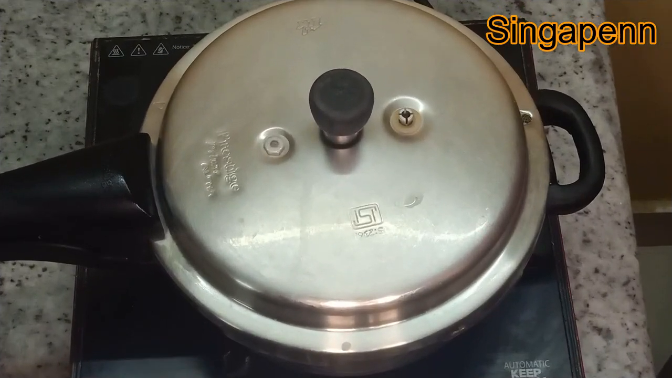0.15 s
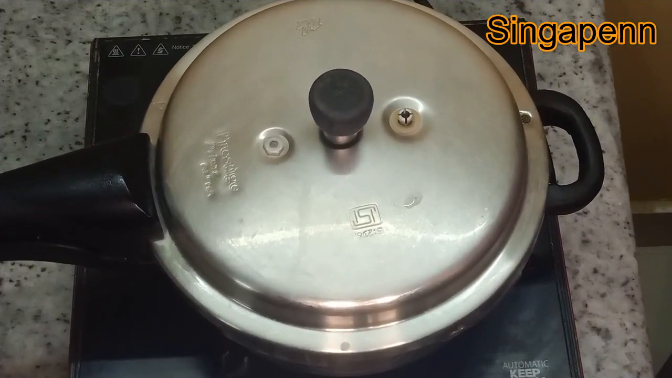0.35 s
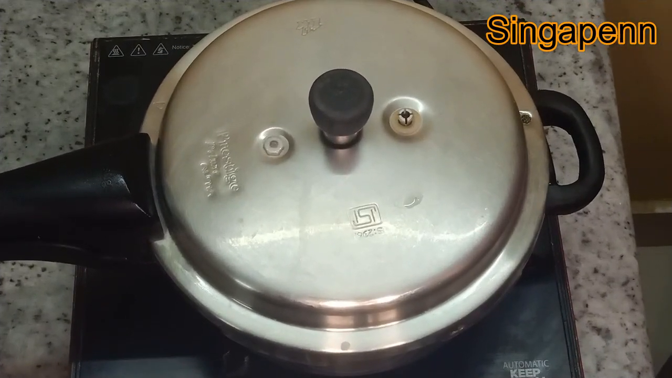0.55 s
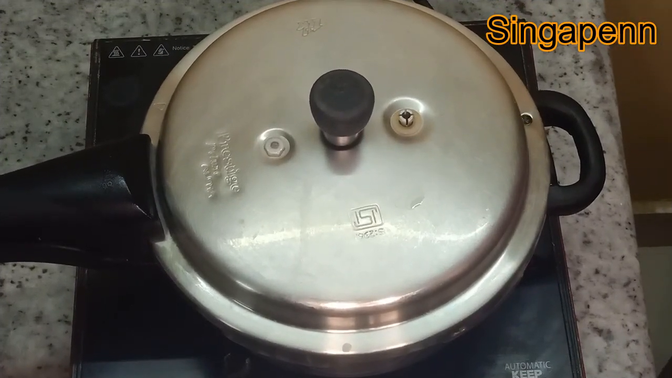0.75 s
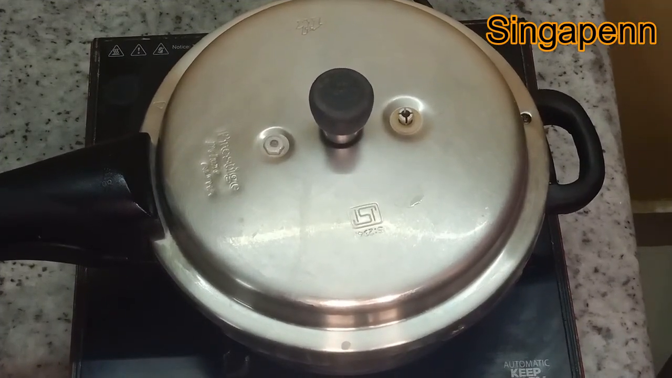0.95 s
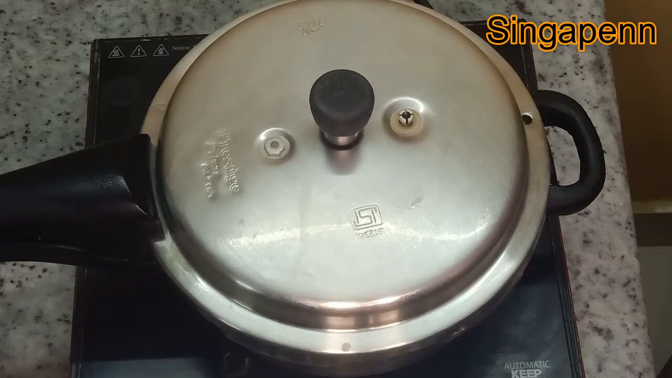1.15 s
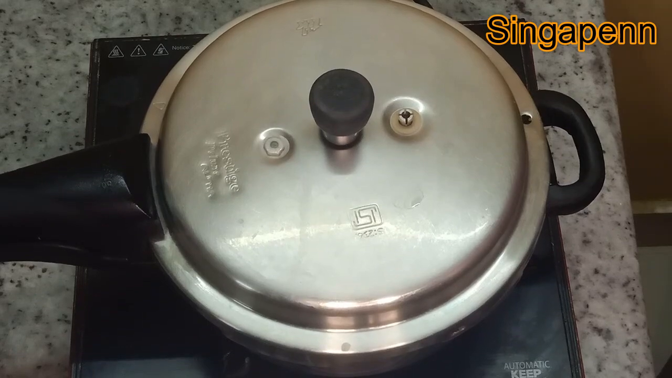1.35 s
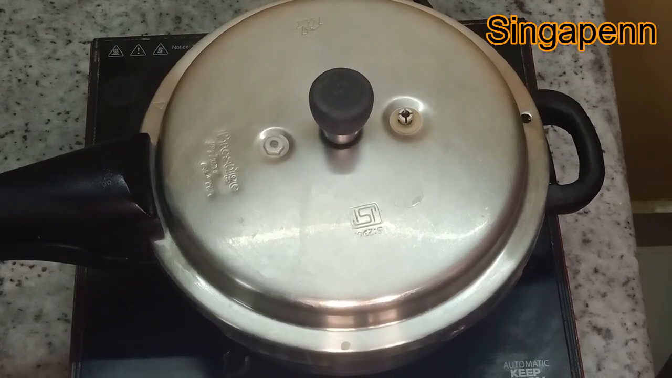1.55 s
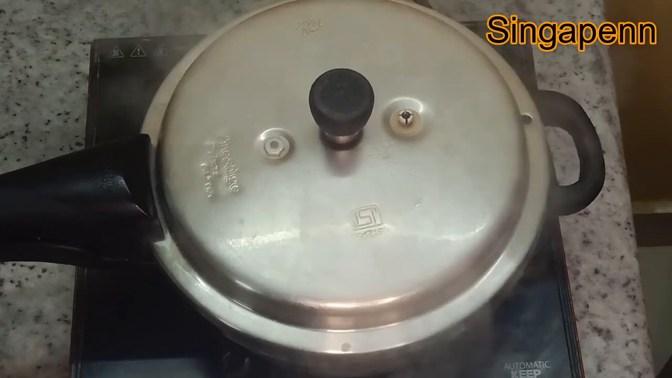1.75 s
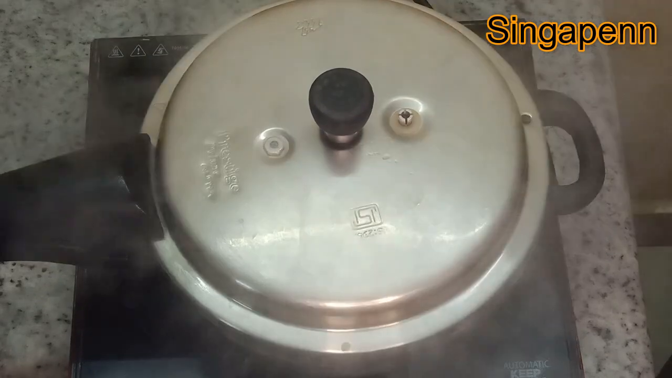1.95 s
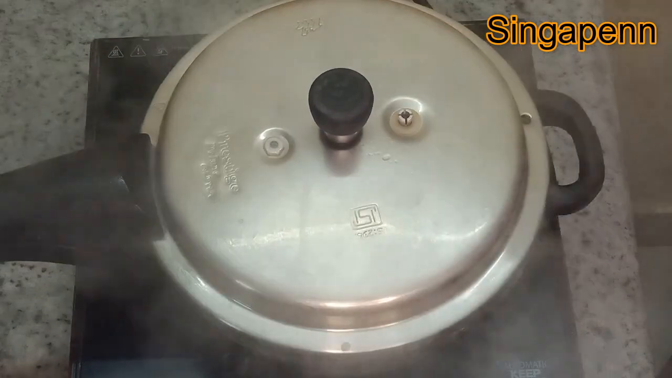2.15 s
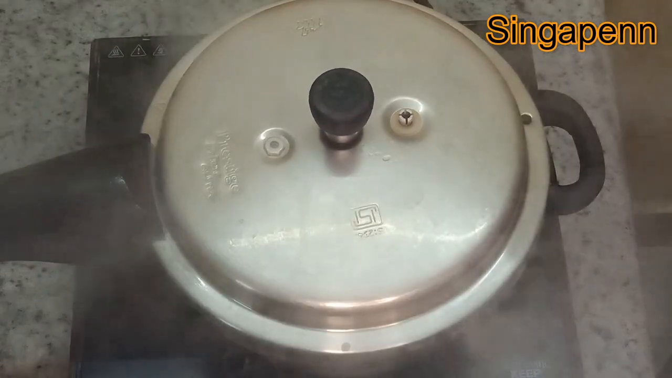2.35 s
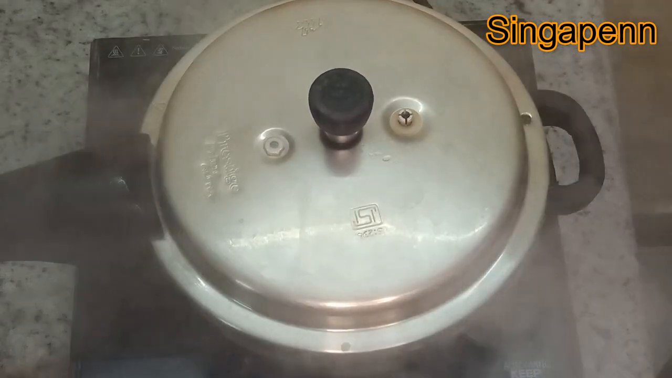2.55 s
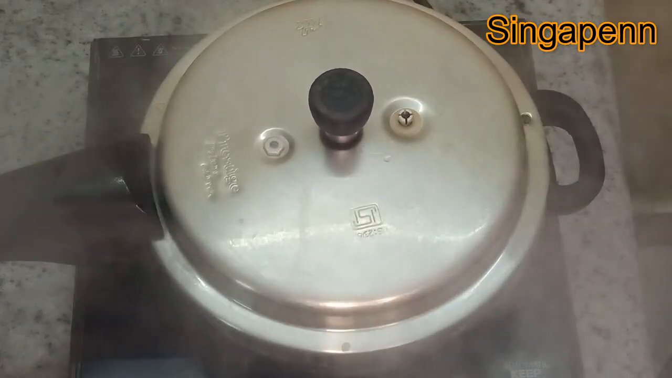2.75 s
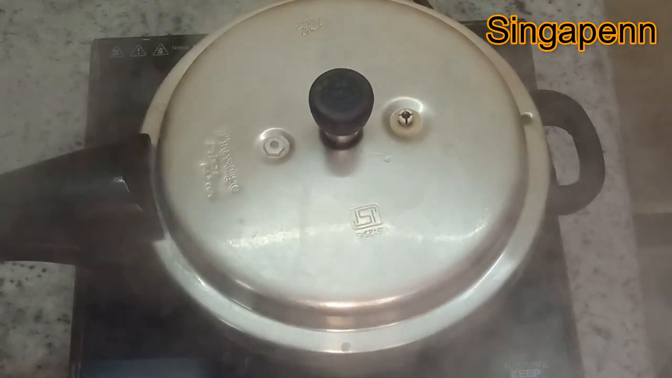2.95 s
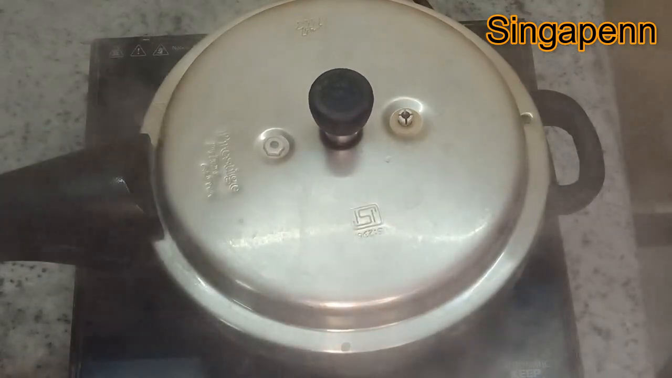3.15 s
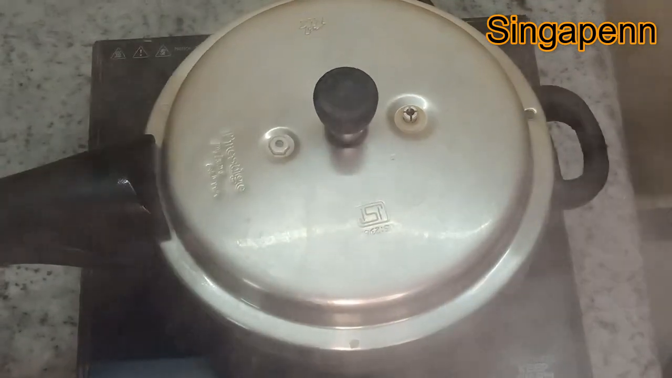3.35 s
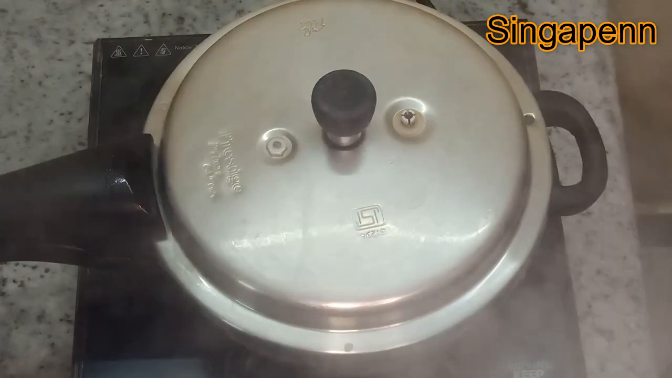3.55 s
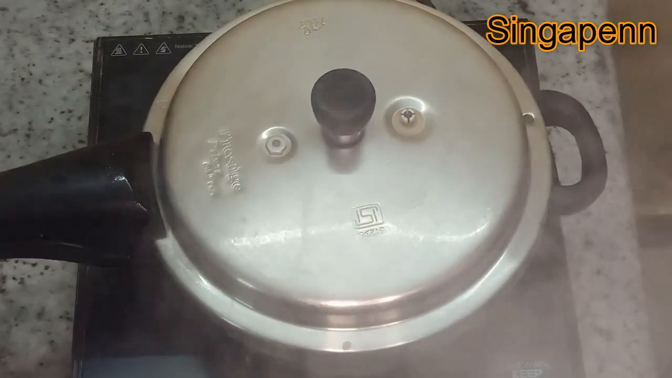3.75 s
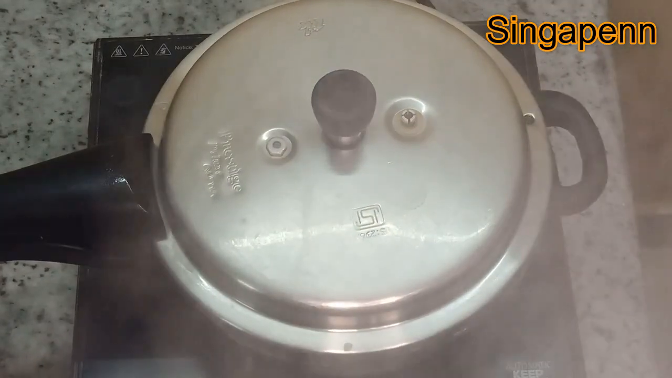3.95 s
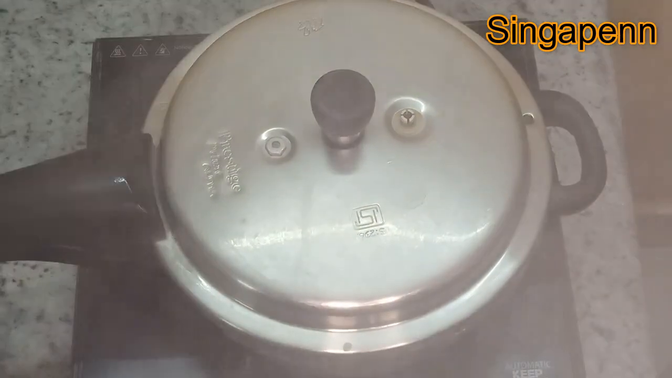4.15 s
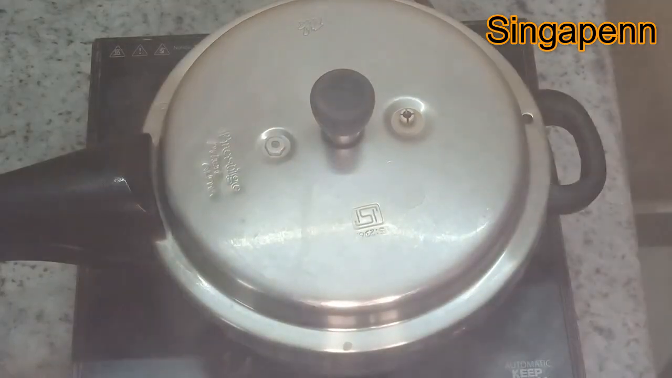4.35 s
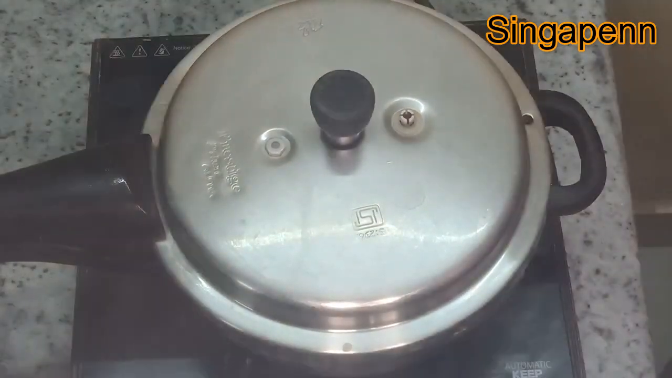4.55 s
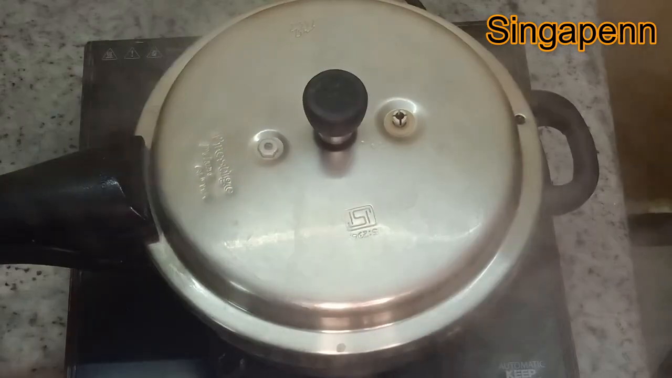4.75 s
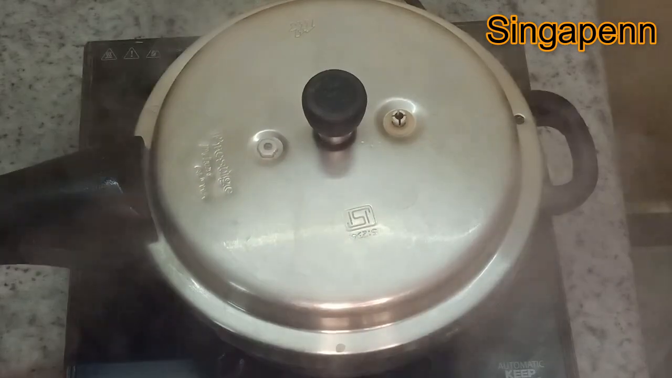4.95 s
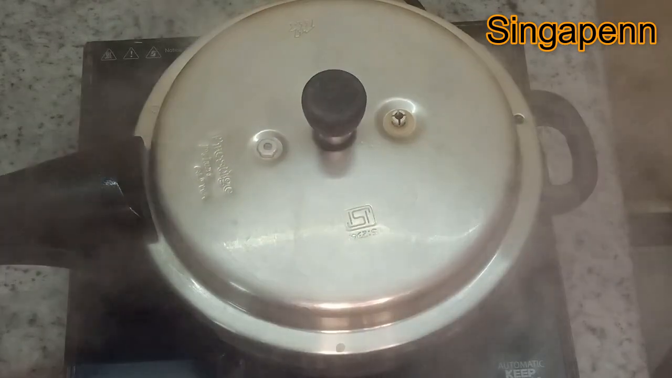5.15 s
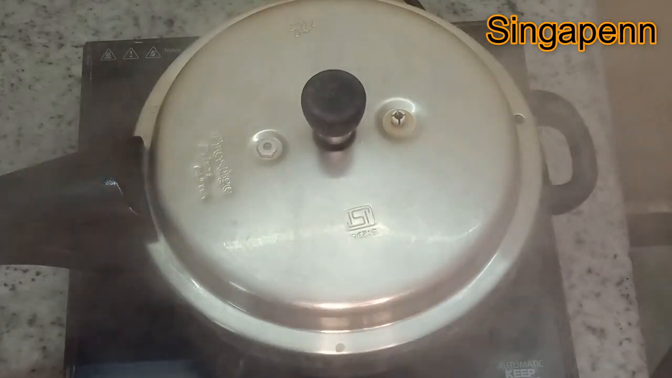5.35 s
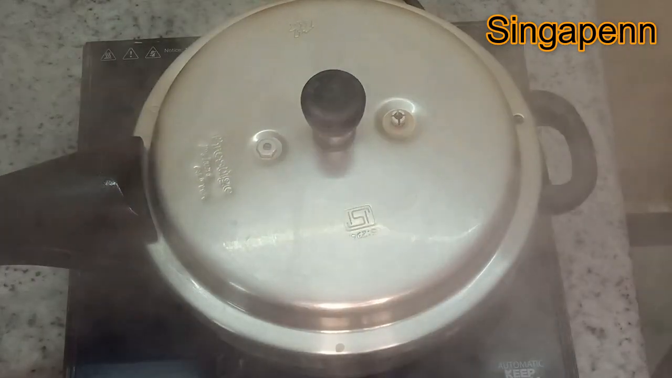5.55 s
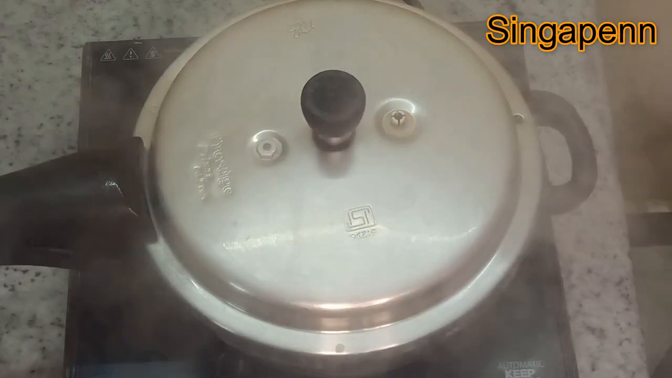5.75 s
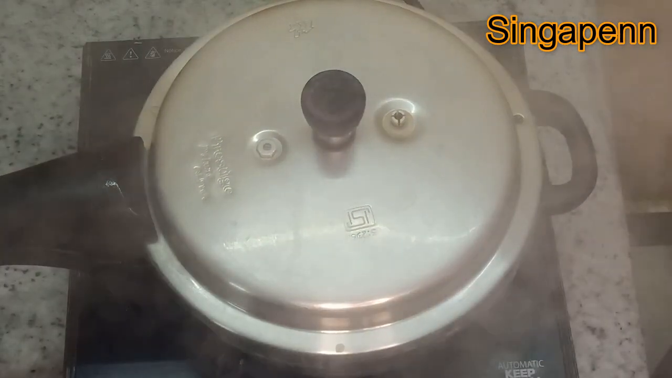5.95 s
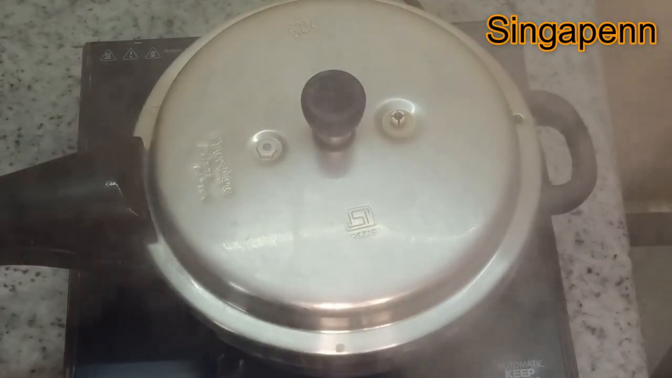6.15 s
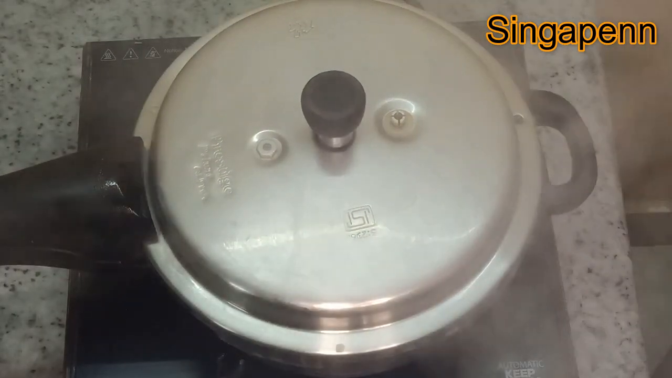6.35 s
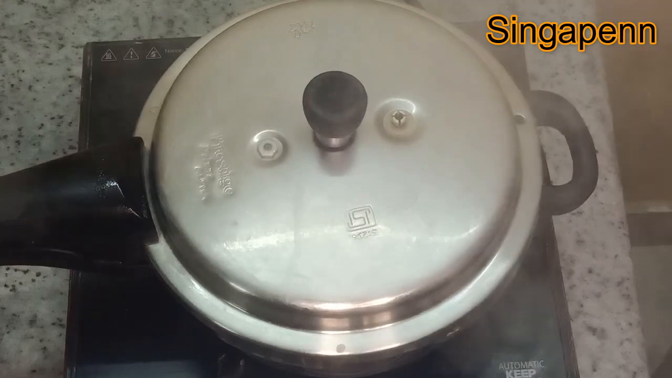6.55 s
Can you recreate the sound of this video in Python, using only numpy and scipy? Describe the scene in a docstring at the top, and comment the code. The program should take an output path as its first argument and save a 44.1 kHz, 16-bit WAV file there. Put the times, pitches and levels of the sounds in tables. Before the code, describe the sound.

A pressure cooker vents twice in a kitchen, heard in stereo over the soft whir of a hob fan. After a brief low drone and some sputtering leaks, steam bursts out in a bright hiss with a little low rumble on the microphone. It pauses, then bursts out again. Each blast starts loud, settles lower and finishes with the valve weight clattering on the metal lid. Two tiny dropouts interrupt the sound.

```python
"""A pressure cooker: steam leaks past the weight valve, then lifts it twice. Each blast starts loud,
sinks as if turned down automatically, holds, and ends as the weight rattles onto its seat, ringing
the lid. The induction hob's fan whirs behind it; a dull drone sounds at the start. A two-port
microphone hears it, from a second position for the second blast. The sound cuts out briefly twice."""
import sys
import numpy as np
from scipy import signal
from scipy.io import wavfile
from scipy.ndimage import uniform_filter1d

SR = 44100
rng = np.random.default_rng(int(sys.argv[2]) if len(sys.argv) > 2 else 0)


def wav_out(sig):
    """Save sig, one row per channel (or a flat mono array), as 16-bit PCM at SR to the path in sys.argv[1]."""
    wavfile.write(sys.argv[1], SR, np.round(np.clip(np.atleast_2d(sig).T, -1, 1) * 32767).astype(np.int16))


N = 291623
T = np.arange(N) / SR
FFT_SIZE, HOP = 2048, 512
BIN_HZ = np.fft.rfftfreq(FFT_SIZE, 1 / SR)
FRAME_S = np.arange(N // HOP + 5) * HOP / SR


def gain(db):
    """dB to amplitude factor."""
    return 10 ** (np.asarray(db) / 20)


def unit_rms(x):
    """Scale to rms 1 over all channels."""
    return x / np.sqrt(np.mean(x ** 2) + 1e-20)


def spectrum(table, column=1):
    """Table column interpolated over the bins, log frequency."""
    table = np.array(table)
    return np.interp(np.log(BIN_HZ + 1), np.log(table[:, 0] + 1), table[:, column])[:, None]


def bells(hz, width_hz):
    """One unit-height bell over the bins per centre."""
    return np.exp(-2 * ((BIN_HZ - hz[:, None]) / width_hz[:, None]) ** 2)


def pan_db(left_minus_right_db):
    """Split a balance into left and right offsets."""
    return left_minus_right_db * np.array([.5, -.5])[:, None, None]


def air_noise(colour_db, coherence, patch_db, flicker_db, lead_rad=0):
    """Unit-rms stereo noise with drifting spectral patches and a shared level flicker."""
    a, b, c, d, patches = rng.standard_normal((len(FRAME_S), len(BIN_HZ), 5)).T
    patches = unit_rms(uniform_filter1d(uniform_filter1d(patches, size=25, axis=0), size=5, axis=1))
    flicker = unit_rms(uniform_filter1d(uniform_filter1d(rng.standard_normal(N), size=300), size=300))
    left = a + 1j * b
    right = coherence * np.exp(1j * lead_rad) * left + np.sqrt(1 - coherence ** 2) * (c + 1j * d)
    spectra = np.array([left, right]) * gain(colour_db + patch_db * patches)
    noise = signal.istft(spectra, nperseg=FFT_SIZE, noverlap=FFT_SIZE - HOP)[1][:, :N]
    return unit_rms(noise * gain(flicker_db * flicker))


# Drone spectrum: f/Hz, relative density/dB
DRONE_SPECTRUM = [(24, -103), (40, -73), (74, -70), (135, -13.5), (246, -4), (367, -12.5), (834, -14),
                  (1160, -18), (1660, -15), (3520, -26.5), (8000, -47), (10400, -97), (17600, -120)]


def drone():
    """Dull centred noise with one brief swell; stops at the first silence."""
    swell_s, width_s = .416, .04
    level_db = -55 + 4.5 * np.exp(-((T - swell_s) / width_s) ** 2)
    noise = air_noise(spectrum(DRONE_SPECTRUM), coherence=1, patch_db=1.5, flicker_db=1)
    return noise * gain(level_db) * (T < SILENCES[0][0])


# Air through the housing: f/Hz, relative density/dB
FAN_SPECTRUM = [(25, -22), (60, -13), (100, -8), (200, -14), (300, 0.5), (420, -7), (750, -7.5), (1100, 1),
                (1400, -3), (2100, -3), (4500, -19), (6500, -14), (7800, -18.5), (8800, -38.5),
                (15500, -38)]
# Likeness of the channels: f/Hz, correlation
FAN_COHERENCE = [(60, 0.84), (130, 0.86), (290, 0.89), (640, 0.43), (1410, 0.18), (3100, -0.04),
                 (6820, -0.05), (15000, -0.17)]
# Balance: f/Hz, left minus right/dB
FAN_PAN = [(60, 0.0), (130, -0.5), (290, -0.5), (640, 0.0), (1410, 1.5), (3100, -0.5), (6820, -0.5),
           (15000, -3.0)]
# Blade and housing tones: f/Hz, width/Hz, level re air/dB
BLADE_TONES = [(281, 10, -15), (371, 25, -18), (910, 20, -22), (1058, 20, -11), (1125, 12, -9),
               (1206, 25, -14), (1265, 25, -18), (1969, 10, -20)]
# Extra gain of the tones below 500 Hz: t/s, gain/dB
HUM_GAIN = [(.15, -13), (.3, -2), (.58, -4.5), (1.0, 7), (1.6, -0.5), (3.5, -5), (6.62, -2)]


def fan():
    """Housing air and wavering blade tones; quieter from the first blast on, dipping under each."""
    start_s, early_db, late_db, dip_db = .15, -50.5, -57, 3.5
    balance_db = pan_db(spectrum(FAN_PAN))
    whir = air_noise(spectrum(FAN_SPECTRUM) + balance_db, spectrum(FAN_COHERENCE),
                     patch_db=1, flicker_db=.5)
    hum = gain(np.interp(T, *np.transpose(HUM_GAIN)))
    for hz, width_hz, db in BLADE_TONES:
        pole = np.exp(-np.pi * width_hz / SR)
        waver = signal.lfilter([1], [1, -pole], rng.standard_normal(N) + 1j * rng.standard_normal(N))
        tone = unit_rms((waver * np.exp(2j * np.pi * hz * T)).real)
        tone_db = db + balance_db[:, round(hz / BIN_HZ[1])]
        whir += tone * gain(tone_db) * (hum if hz < 500 else 1)
    lift_s, _, _, _, sag_s, _ = VALVE_LIFTS[0]
    level_db = np.interp(T, [lift_s, lift_s + sag_s], [early_db, late_db])
    dip = sum(sunk * (T < drop_s + SHUT_S / 2) for _, _, sunk, drop_s in blast_envelopes())
    return whir * gain(level_db - dip_db * uniform_filter1d(dip, size=8000)) * (T > start_s)


# Lid, hob and wall echoes: f/Hz, width/Hz, gain/dB at left 1, right 1, left 2, right 2 (positions 1, 2)
ECHO_BANDS = [(1100, 600, 3.2, 2.4, 2.9, 4.4), (1540, 200, -2.7, 2.6, -2.6, 2.5),
              (2060, 350, -0.4, -2.2, -1.6, -4.8), (2340, 70, 3.3, 0.3, 3.0, 0.1),
              (2540, 200, -0.9, -0.7, -2.4, -3.5), (2740, 70, 1.1, 2.5, 0.9, 2.7),
              (2900, 200, 4.1, 2.8, 2.8, 0.9), (3060, 70, -0.2, -1.9, 1.0, -2.7),
              (3220, 120, -2.6, 2.6, -0.1, -0.6), (3380, 350, -1.4, 3.0, -2.7, 6.3),
              (3780, 350, 2.0, -0.6, 2.3, 3.5), (4020, 120, 1.7, -4.1, -0.4, -5.0),
              (4260, 200, -4.0, -4.1, -5.5, -5.6), (4620, 200, 2.3, 1.8, 1.0, 0.1),
              (4860, 120, 0.3, 0.7, 1.2, -3.4), (4980, 200, -0.4, -6.0, 0.2, -4.3),
              (5300, 200, -3.3, -3.4, -3.9, -1.1), (5540, 120, 0.9, 2.2, 0.7, 2.0),
              (6060, 350, 3.1, 2.6, 1.2, 3.4), (6540, 200, -0.9, -1.6, -1.8, -4.5),
              (6900, 200, -0.6, 1.9, -0.2, 0.9), (7180, 200, 4.0, 2.6, 5.0, 1.0),
              (7540, 200, -4.5, -2.7, -4.2, -0.0), (7820, 200, 0.6, 5.5, 1.0, 9.1),
              (8700, 1000, -2.9, 0.3, -1.8, 0.6), (10380, 350, -2.4, -2.1, 0.0, 1.1),
              (11660, 600, 1.2, 1.7, 1.1, 3.1), (13100, 600, -1.6, -2.6, 0.5, 1.2),
              (13860, 1000, -2.6, 1.7, -1.8, 0.7), (15420, 1000, -0.6, 4.5, -8.2, 6.3)]
# Narrow steady peaks that colour the steam hiss: f/Hz, width/Hz, gain/dB
HISS_PEAKS = [(2358, 30, 3), (2758, 60, 3), (3371, 50, 2), (4047, 20, 5), (4175, 25, 3), (4600, 80, 2),
              (4938, 20, 3), (5798, 50, 3), (6069, 25, 3), (6282, 30, 4)]
# Steam at the two ports: f/Hz, coherence, right lead/rad at position 1, at position 2
PORT_COHERENCE = [(300, .3, 0, 0), (1000, .45, -.3, -.6), (1750, .7, -1.1, -2.1), (2150, .3, -.6, -1.5),
                  (2750, .8, -.5, -.4), (3150, .25, -1.7, -1.8), (3650, .78, -2.3, -2.2),
                  (4150, .35, -2.6, -2.6), (4600, .72, -1.9, -2.1), (5200, .35, -1.6, -1.6),
                  (5500, .5, -2.4, -2.2), (5800, .4, -5.3, -5.3), (6300, .6, -3.7, -3.8),
                  (7100, .55, -2.8, -3.6), (7700, .4, -5.2, -5.5), (8600, .35, -4.8, -5.6),
                  (9400, .25, -3.6, -4), (10600, .55, -3.4, -3.4), (13200, .6, -3.1, -3.1),
                  (14000, .2, -3.1, -3.1)]


def steam_path():
    """Peaks, notches and port phase that the steam picks up on its way through the room."""
    at_first_position = FRAME_S < 4.365
    hz, width_hz, *band_db = np.transpose(ECHO_BANDS)
    position_db = (np.array(band_db) @ bells(hz, width_hz)).reshape(2, 2, -1, 1)
    echo_db = np.where(at_first_position, *position_db)
    lead_rad = np.where(at_first_position, spectrum(PORT_COHERENCE, 2), spectrum(PORT_COHERENCE, 3))
    hz, width_hz, height_db = np.transpose(HISS_PEAKS)
    peaks_db = (height_db @ bells(hz, width_hz))[:, None]
    # Late kitchen echoes: fine steady ripple per port.
    ripple_db = 1.4 * unit_rms(uniform_filter1d(rng.standard_normal((2, len(BIN_HZ), 1)), 3, axis=1))
    return echo_db + peaks_db + ripple_db, lead_rad


# Leak hiss: f/Hz, relative density/dB
LEAK_SPECTRUM = [(500, -40), (1100, -18), (1800, -9), (2800, -1.5), (4200, -4.5), (6200, 1.5), (7800, -7.5),
                 (9300, -16.5), (15600, -22.5)]
# Spurts: t/s, peak level/dB
LEAK_SPURTS = [(.665, -46.5), (.76, -41.5), (.96, -47.5), (1.06, -47), (1.18, -48.5), (1.31, -45.5),
               (1.41, -43), (1.52, -42.5)]


def leak(path_db, lead_rad):
    """Steam seeps and spurts past the seated weight until the first lift."""
    start_s, fade_s, floor_db, path_share = .64, .02, -51, .4
    rise_db_per_s, fall_db_per_s = 123, 157
    peak_s, peak_db = np.transpose(LEAK_SPURTS)[:, :, None]
    spurt_db = peak_db - np.maximum(rise_db_per_s * (peak_s - T), fall_db_per_s * (T - peak_s))
    gate = np.clip((T - start_s) / fade_s, 0, 1) * (T < VALVE_LIFTS[0][0])
    hiss = air_noise(spectrum(LEAK_SPECTRUM) + path_share * path_db, spectrum(PORT_COHERENCE),
                     patch_db=1, flicker_db=.9, lead_rad=lead_rad)
    return hiss * gain(np.maximum(spurt_db.max(0), floor_db)) * gate


# Lifts of the weight: lift t/s, lead-in slope/(dB/s), held gain/dB, sag/dB, sag time/s, drop t/s
VALVE_LIFTS = [(1.703, 157, -30.5, 9, 0.71, 3.485), (4.636, 9000, -31.2, 8, .55, 6.424)]
SHUT_DB, SHUT_S, KNEE_S = 74.5, .45, .016


def blast_envelopes():
    """Each blast starts loud, its heard level sinks as if turned down automatically, holds, dies away."""
    jump_db, jump_s, pop_db, pop_s, creep_db_per_s = 8.5, .005, .5, .038, .5
    for lift_s, swell_db_per_s, held_db, sag_db, sag_s, drop_s in VALVE_LIFTS:
        before_s, after_s = np.maximum(lift_s - T, 0), np.maximum(T - lift_s, 0)
        sunk = np.minimum(after_s / sag_s, 1)
        onset_db = -jump_db * np.minimum(before_s / jump_s, 1) - swell_db_per_s * before_s
        excess_db = sag_db * (1 - sunk) + pop_db * np.exp(-after_s / pop_s)
        creep_db = creep_db_per_s * np.maximum(after_s - sag_s, 0)
        closing_s = KNEE_S * np.logaddexp(0, (T - drop_s) / KNEE_S)
        closing_db = SHUT_DB * (1 - np.exp(-closing_s / SHUT_S))
        envelope_db = onset_db + excess_db + creep_db - closing_db
        yield held_db, envelope_db, sunk, drop_s


# Jet noise: f/Hz, relative density/dB
JET_SPECTRUM = [(500, -45), (930, -24.8), (1080, -15.8), (1700, -6.8), (2700, 0.0), (6300, -0.6),
                (6480, -7.7), (8300, -11.6), (9300, -17.7), (13000, -20.1), (15600, -24.1)]


def jet(blast_gain, path_db, lead_rad):
    """Steam hisses out under the lifted weight."""
    hiss = air_noise(spectrum(JET_SPECTRUM) + path_db, spectrum(PORT_COHERENCE),
                     patch_db=.8, flicker_db=.6, lead_rad=lead_rad)
    return hiss * blast_gain * gain(1.5)


# Turbulence: f/Hz, relative density/dB
ROAR_SPECTRUM = [(25, -26), (60, -41), (110, -2), (180, -3.5), (300, -1.5), (500, 0), (750, 3.5),
                 (1000, 0.5), (1500, -5.5)]


def roar():
    """Low turbulence round the jet, loudest at the start of each blast."""
    base_db, boost_db = -53.5, 8
    noise = air_noise(spectrum(ROAR_SPECTRUM) + pan_db(-7), coherence=.23, patch_db=3.5, flicker_db=2)
    return noise * sum(gain(base_db + envelope_db + boost_db * (1 - sunk ** 2))
                       for _, envelope_db, sunk, _ in blast_envelopes())


# Draught rumble: f/Hz, relative density/dB
BUFFET_SPECTRUM = [(25, -1), (60, -6), (110, -1), (200, -3), (400, -25.5)]


def buffet(blast_gain):
    """Draught from the blast buffets the microphone ports."""
    rumble = air_noise(spectrum(BUFFET_SPECTRUM) + pan_db(-5), coherence=.3, patch_db=2, flicker_db=1)
    return rumble * blast_gain * gain(-38.5)


# Knocks on the seat: t/s, peak before high-pass/dB, tilt/(dB/octave), left minus right/dB
SEAT_KNOCKS = [(3.548, -32.5, 0, 7), (3.559, -33, -18, -3), (3.58, -35, -6, 9), (3.591, -40, -13, 1),
               (3.601, -45, -13, 5), (3.612, -39.5, -20, 3), (6.447, -35, 5, 3), (6.48, -30.5, -2.5, 5.5),
               (6.513, -39, 3, -4), (6.533, -39.5, 2, 5), (6.548, -39.5, -10, 6)]
# Lid modes: f/Hz, relative level/dB, T60/s
LID_MODES = [(523, -33, 0.039), (597, 3, 0.35), (685, 5.5, 0.16), (796, 3, 0.12), (1017, 4, 0.13),
             (1350, 3.5, 0.098), (1636, 8.5, 0.06), (2660, -16, 0.047)]


def weight_rattle():
    """The weight hits its seat: each short clunk leaves the lid ringing more softly."""
    out, t = np.zeros((2, N + SR)), np.arange(SR // 4) / SR
    hz, mode_db, t60_s = np.transpose(LID_MODES)[:, :, None]
    clunk = (1 + 2.5 * np.exp(-t / .004)) * np.minimum(t / .0015, 1)
    for start_s, peak_db, db_per_octave, balance_db in SEAT_KNOCKS:
        scatter_db = 1.5 * rng.standard_normal((len(LID_MODES), 1))
        decays = gain(mode_db + db_per_octave * np.log2(hz / 700) + scatter_db - 60 * t / t60_s)
        knock = (decays * np.sin(2 * np.pi * hz * t)).sum(0) * clunk
        at = round(start_s * SR)
        out[:, at:at + len(t)] += knock / abs(knock).max() * gain(peak_db + pan_db(balance_db)[:, 0])
    return signal.sosfilt(signal.butter(4, 430, "highpass", fs=SR, output="sos"), out[:, :N])


def scene():
    """Steam, fan, drone and rattle, summed in stereo."""
    path_db, lead_rad = steam_path()
    blast_gain = sum(gain(held_db + envelope_db) for held_db, envelope_db, _, _ in blast_envelopes())
    steam = jet(blast_gain, path_db, lead_rad) + leak(path_db, lead_rad) + roar() + buffet(blast_gain)
    return steam + fan() + drone() + weight_rattle()


# Brief silences: start t/s, end t/s
SILENCES = [(.5655, .592), (4.565, 4.601)]


def record(dry):
    """Microphone bass roll-off, two silences with 1 ms ramps, band limit."""
    rolled_off = signal.sosfilt(signal.butter(2, 55, "highpass", fs=SR, output="sos"), dry)
    gates = [np.clip(np.maximum(start_s - T, T - end_s) / .001, 0, 1) for start_s, end_s in SILENCES]
    lowpass = signal.firwin(511, cutoff=15760, window=("kaiser", 9), fs=SR)
    return signal.oaconvolve(rolled_off * np.prod(gates, axis=0), lowpass[None], "same")


dry = scene()
out = record(dry)
wav_out(out)
```